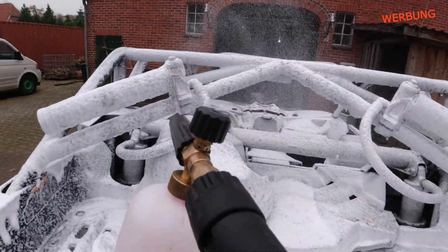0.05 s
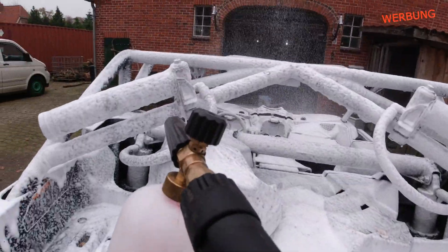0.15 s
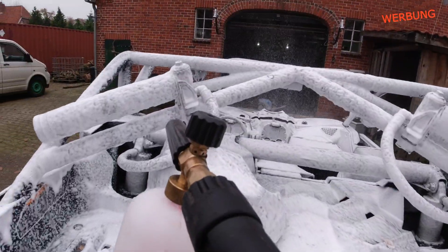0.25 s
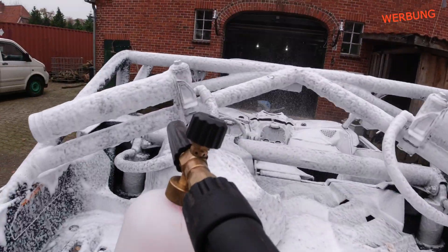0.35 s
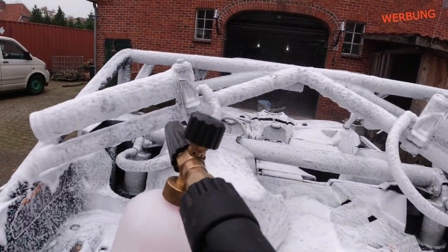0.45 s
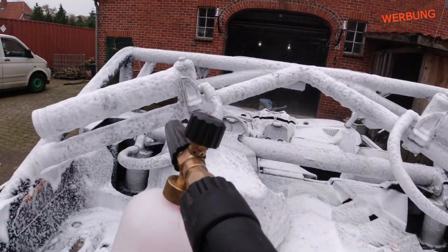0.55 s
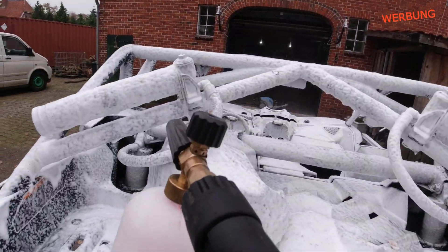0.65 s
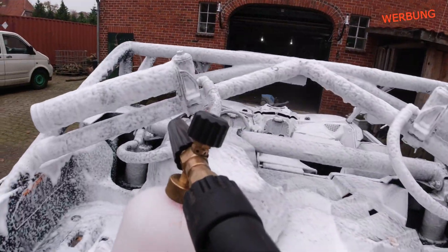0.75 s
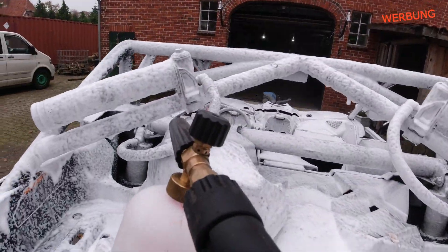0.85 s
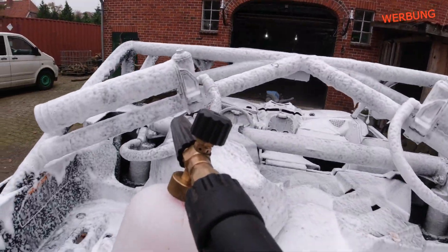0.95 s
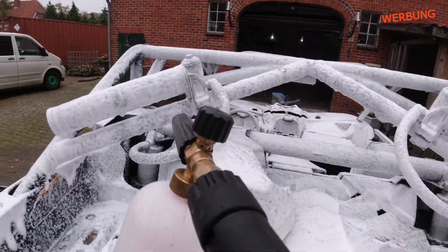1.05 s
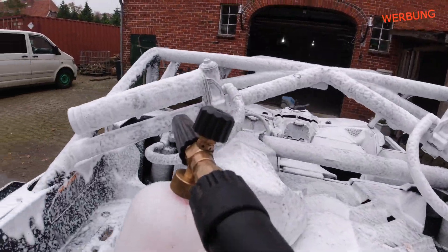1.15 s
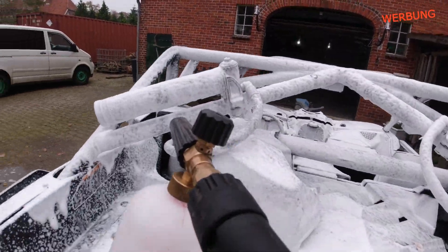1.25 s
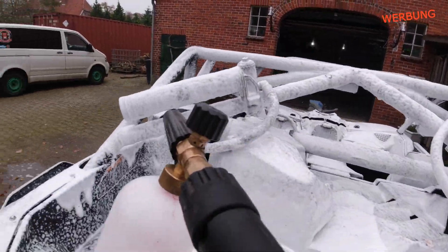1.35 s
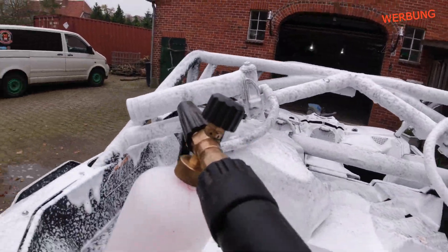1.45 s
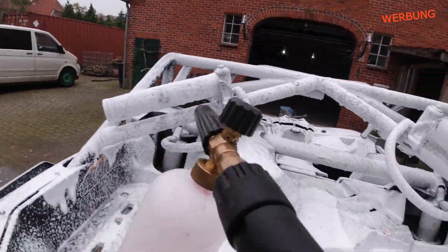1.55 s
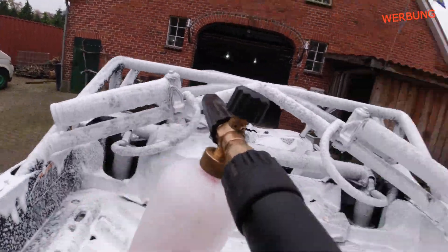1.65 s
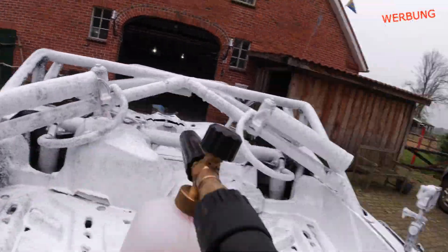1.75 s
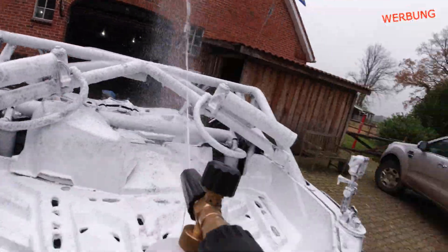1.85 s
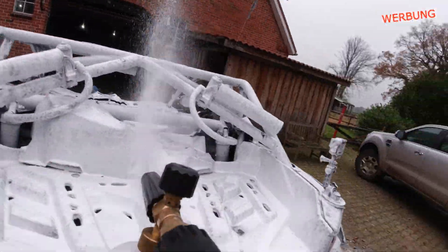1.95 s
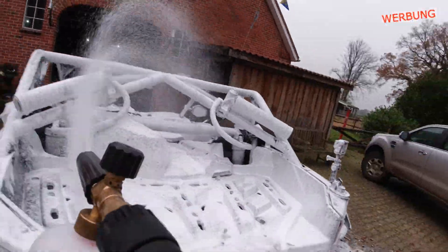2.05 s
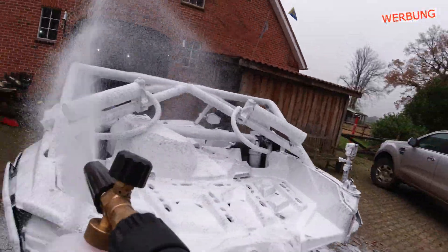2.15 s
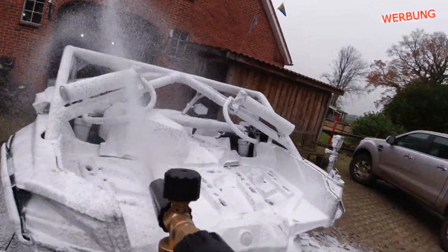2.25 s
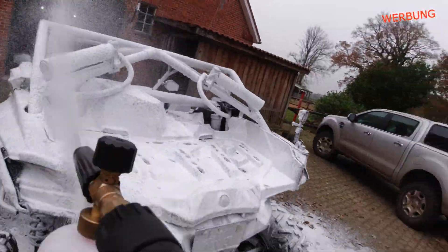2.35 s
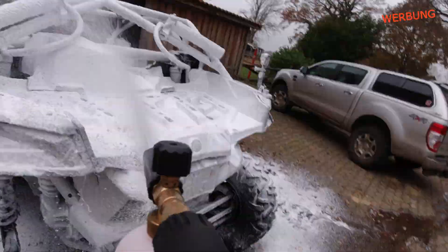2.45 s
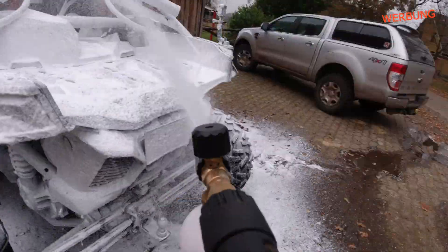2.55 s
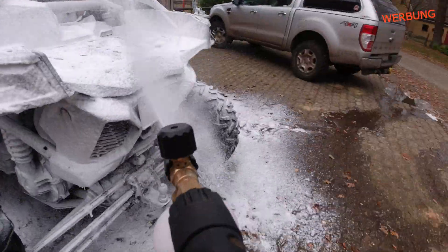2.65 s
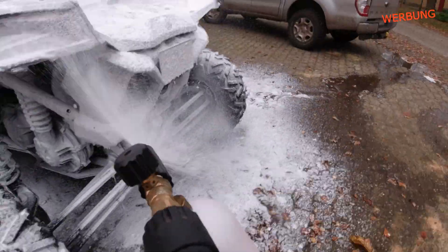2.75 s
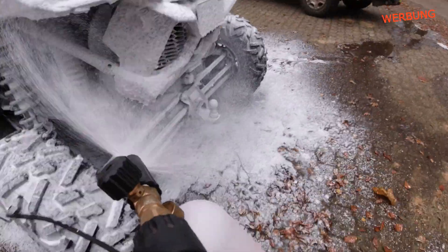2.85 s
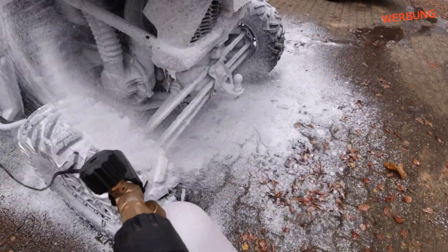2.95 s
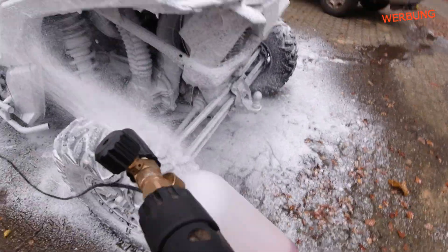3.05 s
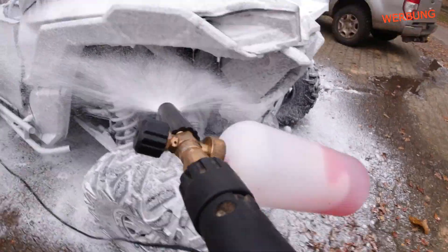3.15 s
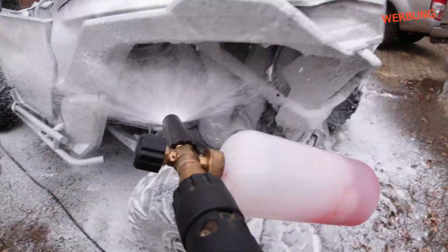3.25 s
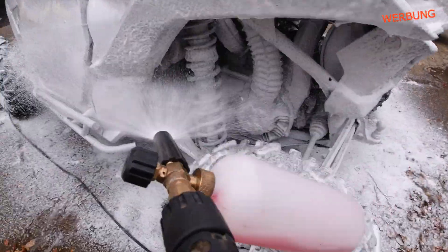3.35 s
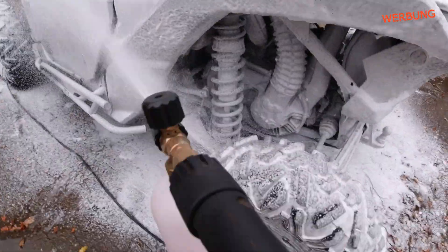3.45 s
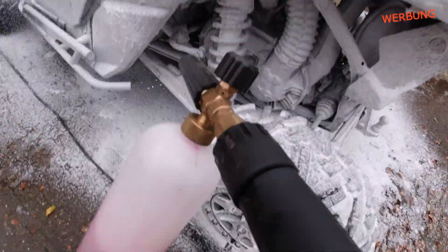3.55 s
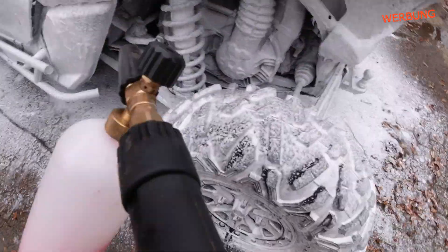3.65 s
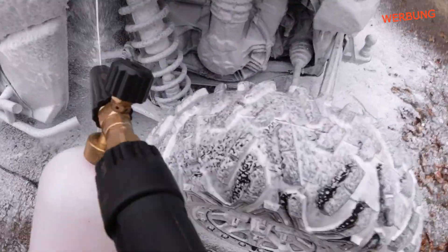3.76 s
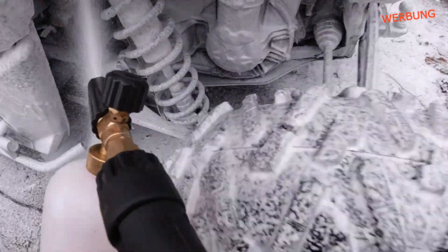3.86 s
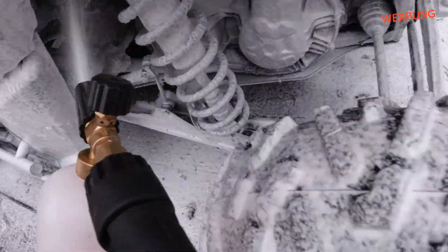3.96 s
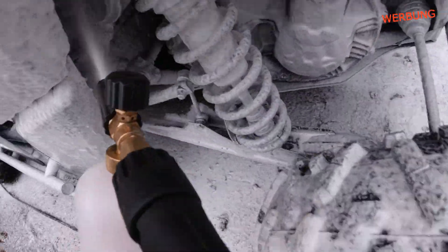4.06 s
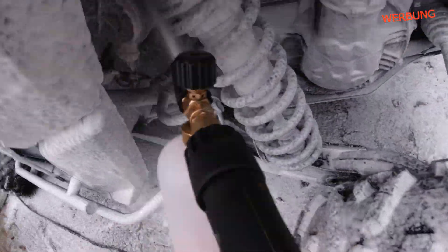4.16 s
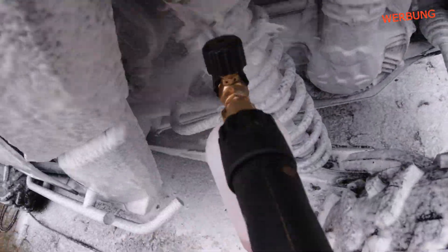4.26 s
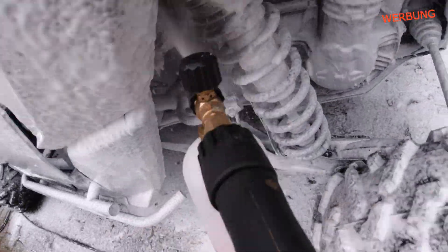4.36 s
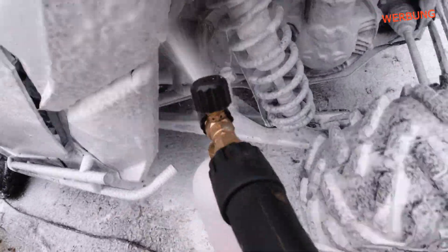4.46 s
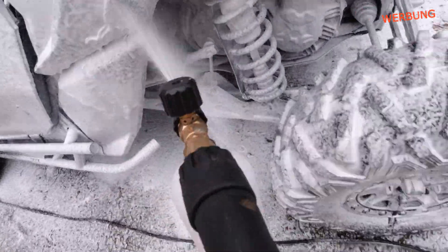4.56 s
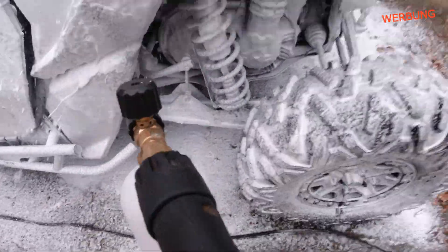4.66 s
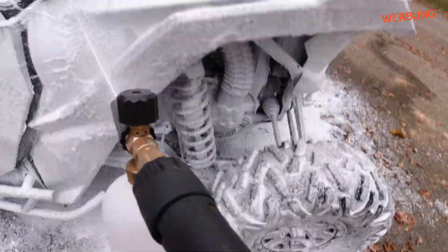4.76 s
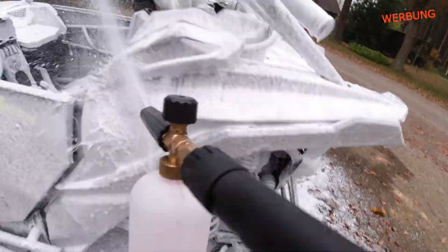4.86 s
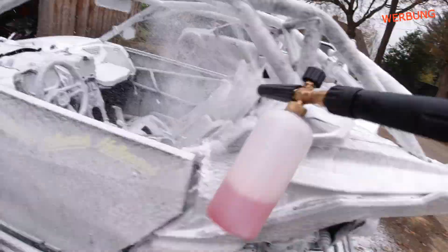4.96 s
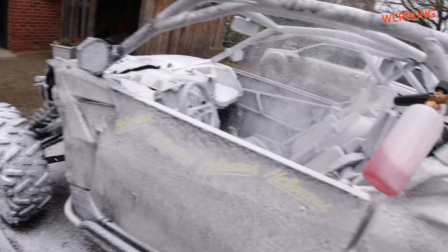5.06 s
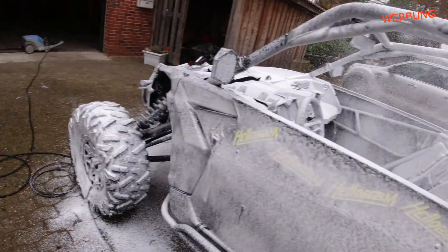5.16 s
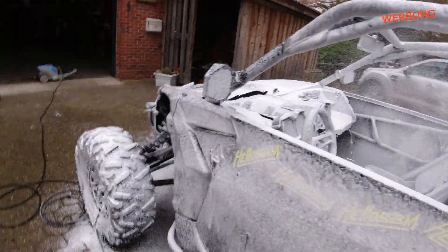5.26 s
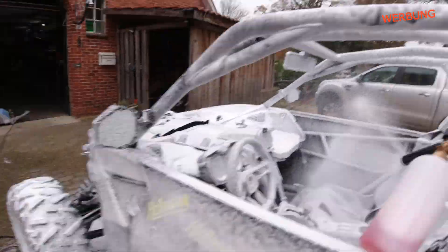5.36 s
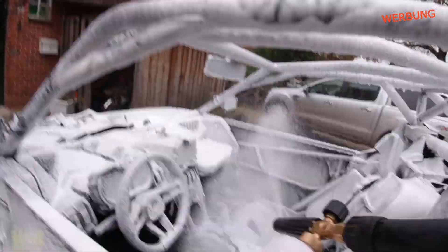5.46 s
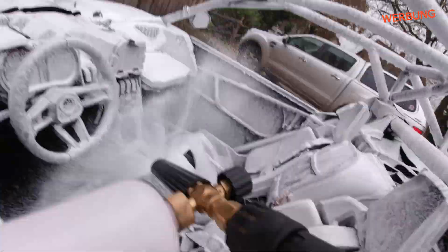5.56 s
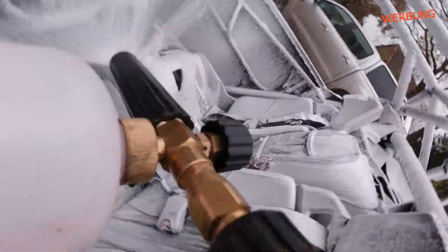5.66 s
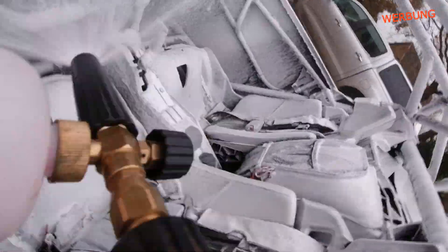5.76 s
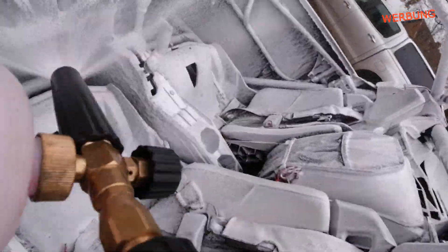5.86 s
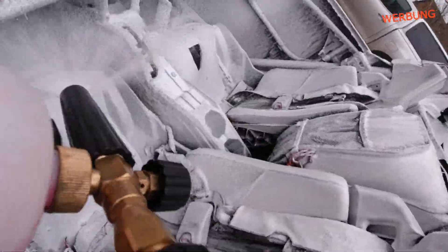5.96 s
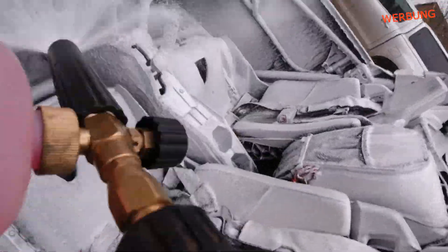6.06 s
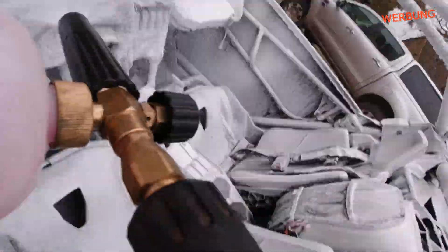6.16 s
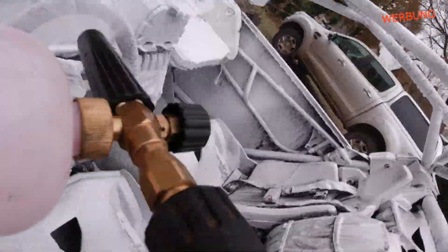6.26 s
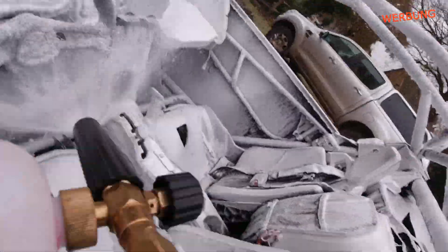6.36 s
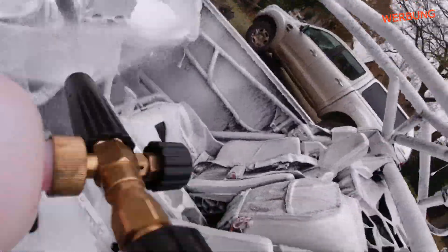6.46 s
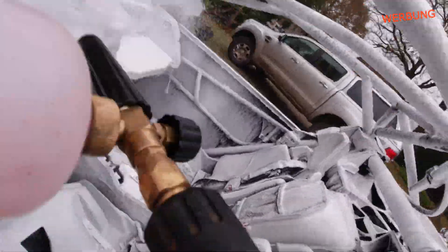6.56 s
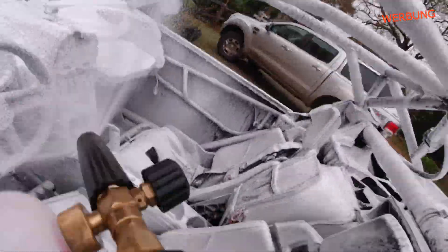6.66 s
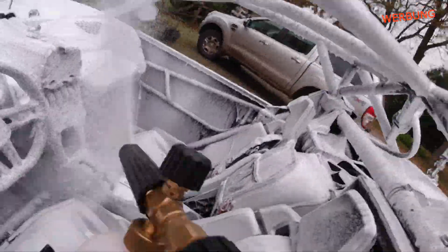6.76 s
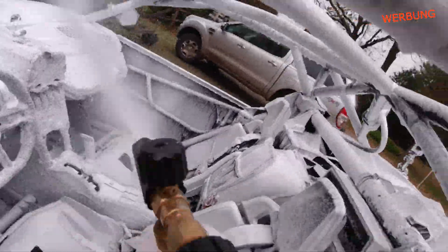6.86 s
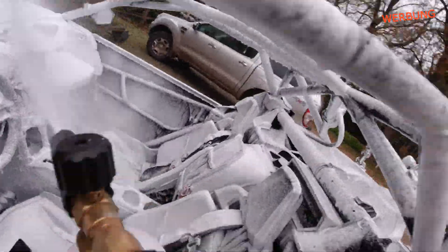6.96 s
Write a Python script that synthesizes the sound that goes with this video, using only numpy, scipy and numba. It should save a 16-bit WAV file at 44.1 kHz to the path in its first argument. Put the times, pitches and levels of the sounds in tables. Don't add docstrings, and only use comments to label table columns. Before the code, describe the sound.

In an open paved yard, a spray tail cuts off at once, leaving faint rumble, rustle and trigger clicks for nearly two seconds. Then a close foam jet spits, stalls for an instant and roars into a steady, whistling hiss. It shuts off twice with clicks and a short gurgle, restarting each time. The last burst wavers as it sweeps across surfaces, with soft knocks on the microphone, which sits very close to the lance in stereo.

```python
import sys
import numpy as np
from scipy import signal
from scipy.fft import rfft, irfft
from scipy.io import wavfile
from scipy.ndimage import uniform_filter1d
from numba import njit

SR = 44100
rng = np.random.default_rng(int(sys.argv[2]) if len(sys.argv) > 2 else 0)


def field_ratio(decibels):
    return 10 ** (np.asarray(decibels, dtype=float) / 20)


def dump(signal):
    limited = np.clip(np.atleast_2d(signal).T, -1, 1)
    pcm = np.round(limited * 32767).astype(np.int16)
    wavfile.write(sys.argv[1], SR, pcm)


N = 308700
TIME = np.arange(N) / SR


def unit(x):
    return x / np.sqrt(np.mean(x ** 2))


def over_hz(points, hz):
    f, v = np.transpose(points)
    return np.interp(np.log(hz + 1), np.log(f), v)


def over_time(table):
    s, *columns = np.transpose(table)
    return [np.interp(TIME, s, c) for c in columns]


def bumps(rows, hold=1.6):
    total_db = 0
    for row in rows:
        total_db = total_db + row[3] * np.minimum(np.interp(TIME, row[:3], [0, hold, 0]), 1)
    return total_db


def within(spans, fade_s=.03):
    gain = np.zeros(N)
    for rows in spans:
        s, db = np.transpose(rows)[:2]
        inside = np.clip(np.minimum(TIME - s[0], s[-1] - TIME) / fade_s + 1, 0, 1)
        gain += field_ratio(np.interp(TIME, s, db)) * inside
    return gain


def swells(rows):
    return within([[(a, db - drop), (b, db), (c, db - drop)] for a, b, c, db, drop in rows])


def walk(count):
    k = SR // count
    steps = np.repeat(rng.standard_normal(N // k + 1), k)[:N]
    return 1.3 * uniform_filter1d(uniform_filter1d(steps, k), k)


def band(x, lo_hz, hi_hz):
    return signal.sosfilt(signal.butter(2, [lo_hz, hi_hz], "band", fs=SR, output="sos"), x)


@njit
def svf(x, hz, width_hz):
    y = np.empty(x.shape)
    for c in range(len(x)):
        b, l = 0., 0.
        for i in range(x.shape[1]):
            g, k = np.tan(np.pi * hz[i] / SR), width_hz / hz[i]
            v = (b + g * (x[c, i] - l)) / (1 + g * (g + k))
            b, l, y[c, i] = 2 * v - b, l + 2 * g * v, k * v
    return y


# [f/Hz, left-right likeness 0-1]
PORT_LIKENESS = [(40, .3), (130, .7), (300, .86), (600, .92), (1400, .93), (2500, .8), (4300, .83),
                 (7000, .7), (15000, .55)]
# [f/Hz, left lead/rad]
PORT_LEAD = [(100, 0), (2500, .3), (4400, 1.05), (7400, 1.2), (10000, .7), (16000, .6)]


def hiss(colour, alike=1.):
    hz = np.arange(N // 2 + 1) * SR / N
    common, own = rfft(rng.standard_normal((2, N)))
    c = np.clip(alike * over_hz(PORT_LIKENESS, hz), 0, 1)
    right = (c * common + np.sqrt(1 - c ** 2) * own) * np.exp(-1j * over_hz(PORT_LEAD, hz))
    return unit(irfft(np.array([common, right]) * field_ratio(over_hz(colour, hz)), N))


def ring(colour, hz, *widths_hz):
    x = hiss(colour)
    for width_hz in widths_hz:
        x = svf(x, hz, width_hz)
    return unit(x)


# [f/Hz, level/dB per Hz]
SPLASH = [(25, -16), (70, -12), (150, -13), (250, -6), (600, -2.5), (1400, -1), (2800, -2), (4300, -3),
          (6000, -5), (9000, -6), (12000, -13), (16000, -18)]
# [t/s, turn to camera/dB, jet in a hollow/dB, fan edge shown/dB]
LANCE = [(0, -9, -1, 0), (2.0, 1, .5, 0), (3.55, 1.2, -.3, 0), (3.9, -3, -1, 2), (4.01, 3, -2, -2),
         (4.13, -2.5, 1, 2), (4.27, 0, 3.5, -1), (4.46, 2.5, 2, -1), (4.62, 0, 0, 1), (5.04, 0, -1, -3),
         (5.28, -20, -1.5, -4), (5.54, -4, 0, -1), (5.79, 3, 1.5, -2), (5.9, -3, 1, -2), (6.09, 2, 0, -4),
         (6.45, -2.5, 2, -1), (6.72, -2.5, 2, -.5), (6.9, 1.5, 0, 0)]
# [t/s, closeness to panels 0-1]
NEAR = [(0, .2), (3.55, .2), (3.9, .7), (4.3, 1.1), (5.0, .8), (5.6, 1.1), (6.2, .8), (7, .9)]
# [start t/s, deepest t/s, end t/s, level/dB]
BREAKS = [(4.04, 4.08, 4.13, -5), (5.69, 5.72, 5.74, -4), (5.84, 5.88, 5.95, -2), (6.11, 6.14, 6.17, -6),
          (6.22, 6.26, 6.285, -6), (6.39, 6.45, 6.5, -3), (6.72, 6.76, 6.81, -6)]
# [start t/s, peak t/s, end t/s, level/dB, f/Hz]
SPLITS = [(3.95, 4.03, 4.12, -36, 4800), (4.17, 4.25, 4.31, -35, 5300), (4.5, 4.6, 4.68, -37, 4900),
          (4.98, 5.07, 5.13, -38, 4900), (5.48, 5.66, 5.72, -34, 4850), (5.7, 5.74, 5.79, -34, 4500),
          (6.4, 6.49, 6.56, -39, 4800), (6.8, 6.91, 7.0, -37, 4800)]
# [start t/s, peak t/s, end t/s, extra level/dB]
SPATTER = [(3.85, 4.05, 4.22, 4), (4.25, 4.335, 4.42, 12), (5.2, 5.45, 5.7, 3), (5.55, 6.15, 6.7, 5),
           (6.7, 6.85, 7.1, 2)]


def lance():
    aim_db, hollow_db, shown_db = over_time(LANCE)
    near, = over_time(NEAR)
    flow_db, settled = flow()
    unsettled = 1 - settled
    white = [(20, 0), (20000, 0)]

    throat_db = -36 + .45 * aim_db + hollow_db + .3 * walk(count=10)
    throat_hz = 1490 + 70 * hollow_db + 40 * walk(count=9)
    throat_ripple_db = -1.5 - 2.5 * unsettled + 1.2 * walk(count=15)
    jet = ring(white, throat_hz, 480., 900.) * field_ratio(throat_ripple_db)

    whistle_db = -28.9 + aim_db + bumps(BREAKS) + .9 * walk(count=40) - throat_db
    whistle_db = whistle_db - 7.5 * unsettled + 1.4 * near * walk(count=14)
    whistle_hz = 4230 - 170 * unsettled + 30 * walk(count=14)
    whistle_hz = whistle_hz * (1 + near * (.012 * walk(count=20) + .006 * walk(count=7)))
    jet += ring(white, whistle_hz, 450., 800.) * field_ratio(whistle_db)

    twin_hz = over_time([row[1::3] for row in SPLITS])[0] * (1 + .02 * walk(count=12))
    twin_gain = swells([(*row[:4], 7) for row in SPLITS]) * field_ratio(1.5 * walk(count=20) - throat_db)
    jet += ring(white, twin_hz, 400., 700.) * twin_gain

    edge_db = -33 + .7 * aim_db + shown_db - throat_db
    edge_hz = 7650 * (1 + .015 * walk(count=6))
    edge_ripple_db = -1.5 - 3 * unsettled + 1.2 * walk(count=20)
    jet += ring(white, edge_hz, 1200., 2200.) * field_ratio(edge_db + edge_ripple_db)

    mist_db = -45.2 + .15 * aim_db + bumps(SPATTER) + 1.2 * walk(count=7) - throat_db
    low_db = -10.5 - .9 * hollow_db + 1.5 * walk(count=6)
    middle_db = 1.1 - .7 * hollow_db - 1.5 * unsettled + .8 * walk(count=12)
    high_db = edge_db - 1.2 - .5 * shown_db + 2.5 * unsettled + .8 * walk(count=12)
    mist_db = mist_db + 1.8 * near + 2.5 * unsettled + .8 * walk(count=20)
    for lo_hz, hi_hz, db in [(90, 750, low_db), (800, 4500, middle_db), (4500, 10000, high_db),
                             (10000, 18000, mist_db)]:
        jet += unit(band(hiss(SPLASH), lo_hz, hi_hz)) * field_ratio(db)

    sputter_db = .55 * walk(count=30) + .8 * walk(count=90)
    return bodywork(jet, near) * field_ratio(throat_db + sputter_db + flow_db - .5)


# [opens t/s, stalls t/s, refills t/s, shuts t/s, stall level/dB]
TRIGGER = [
    (-.5, -.4, -.3, .008, -25),
    (1.878, 1.95, 1.982, 3.563, -25),
    (3.779, 3.838, 3.875, 4.686, -20),
    (4.806, 4.874, 4.897, 7.5, -22.5),
]
# [t/s from it, level/dB]
OPENING = [(-.02, -42), (-.004, -19), (.003, 3), (.02, -1)]
REFILL = [(.003, 0), (.05, 0)]
SHUTTING = [(-.004, 0), (.006, -19), (.035, -34), (.08, -50)]


def flow():
    db, settled = np.full(N, -90.), np.zeros(N)
    for opens, stalls, refills, shuts, stall_db in TRIGGER:
        stall = [(stalls - .008, -4.5), (stalls + .008, stall_db), (refills - .01, stall_db + 3)]
        slam_db = .75 * (-21.5 - stall_db)
        refill = np.add(REFILL, [(refills, slam_db), (refills, 0)])
        opening, shutting = np.add(OPENING, (opens, 0)), np.add(SHUTTING, (shuts, 0))
        times, levels = np.vstack([opening, stall, refill, shutting]).T
        db = np.maximum(db, np.interp(TIME, times, levels, left=-90, right=-90))
        settling_s = [refills - .01, refills + .045, shuts + .2, shuts + .21]
        settled = np.maximum(settled, np.interp(TIME, settling_s, [0, 1, 1, 0]))
    return db, settled


def bodywork(x, near):
    path_s = np.clip(.002 + .0009 * walk(count=3), .0003, .01)
    place = np.arange(N) - SR * path_s
    return x + .35 * near * np.array([np.interp(place, np.arange(N), c) for c in x])


# [loudest t/s, level/dB, f/Hz]
DRAIN = [
    (.045, -57, 1300),
    (3.607, -41, 1345),
    (4.735, -52, 1320),
]


def drain():
    hz = over_time([(s, f) for s, db, f in DRAIN])[0] * (1 + .02 * walk(count=30))
    spans = [[(s - .042, db - 5), (s, db), (s + .07, db - 26)] for s, db, _ in DRAIN]
    return ring(SPLASH, hz, 90., 220.) * within(spans, fade_s=.008) * field_ratio(-.7)


def hits(events, crack, push_s, spread, trim_db):
    length = 8192
    out, t = np.zeros((2, N + length)), np.arange(length) / SR
    for s, db, hz, t60_s in events:
        noise = band(rng.standard_normal((2, length)), hz / spread, hz * spread)
        burst = np.sin(2 * np.pi * hz * t) + crack * unit(noise[0] + .3 * noise)
        i = int(s * SR)
        out[:, i:i + length] += field_ratio(db + trim_db - 60 * t / t60_s) * burst * (1 - np.exp(-t / push_s))
    return out[:, :N]


# [t/s, level/dB, f/Hz, t60/s]
KNOCKS = [(.02, -52, 180, .2), (1.685, -43, 345, .09), (5.374, -32, 320, .1), (5.38, -45, 120, .15),
          (5.389, -31, 213, .11), (5.564, -32, 221, .11), (5.57, -42, 100, .15), (6.417, -29, 554, .07),
          (6.421, -32, 200, .12), (6.425, -39, 110, .15), (6.429, -27, 400, .08), (6.785, -29, 223, .14),
          (6.785, -43, 120, .12)]


def camera_knocks():
    return hits(KNOCKS, crack=.62, push_s=.004, spread=1.9, trim_db=-.7)


# [t/s, level/dB, f/Hz, t60/s]
CLICKS = [(.143, -53, 1400, .015), (.152, -55, 2600, .015), (.192, -61, 2600, .01), (1.682, -50, 2400, .03),
          (1.683, -47, 3600, .012), (1.709, -45, 3400, .014), (1.7244, -54, 2450, .04),
          (1.8223, -55, 3500, .012), (3.5964, -43, 2000, .012), (3.6646, -46, 3200, .014),
          (3.672, -52, 2270, .07), (3.7399, -45, 3530, .012), (3.862, -42, 2250, .09)]


def trigger_clicks():
    return hits(CLICKS, crack=.7, push_s=.0004, spread=1.7, trim_db=1.5)


def tone(hz, spans, wander):
    phase = 2 * np.pi * np.cumsum(hz * (1 + wander * walk(count=30))) / SR
    return np.sqrt(2) * swells(spans) * np.sin(phase)


# [start t/s, peak t/s, end t/s, peak level/dB, ends below peak/dB]
VALVE_SONG = [(3.3, 3.48, 3.56, -48, 3), (5.1, 5.23, 5.45, -39, 8), (5.45, 5.55, 5.62, -50, 5)]
MOTOR = [(2.0, 2.7, 3.4, -55, 1), (3.3, 3.48, 3.6, -47, 12), (4.4, 4.6, 4.7, -55, 5),
         (5.75, 6.0, 6.4, -59, 3)]
FAN = [(-.1, .04, .08, -63, 14), (.3, 1.1, 1.85, -76, 5), (1.95, 2.4, 3.3, -62, 2), (3.3, 3.5, 3.7, -57, 9),
       (3.78, 4.0, 4.7, -59, 5)]
FAR_HUM = [(5.2, 5.3, 5.4, -54, 3)]


def pump():
    fan = (tone(425., FAN, .015) + tone(400., FAR_HUM, .005)) * field_ratio(4 * walk(count=25))
    song = tone(1362., VALVE_SONG, .002) * field_ratio(3.5 + 1.2 * walk(count=25))
    motor = tone(282., MOTOR, .008) * field_ratio(-.7 + 1.8 * walk(count=12))
    return song + motor + fan


def recovered():
    return np.minimum(4.5 * TIME, 8)


# [f/Hz, level/dB per Hz]
YARD = [(20, -12), (60, -5), (210, 0), (330, -6), (430, -5), (600, -15), (1000, -13), (2000, -17),
        (3200, -20), (5000, -30), (8000, -38), (16000, -46)]
# [from t/s, rumble level/dB, middle re rumble/dB, rustle re rumble/dB, spray echo level/dB]
PAUSES = [
    (0, -71, -7, -20, -57),
    (3.56, -59, -7, -19, -57),
    (4.69, -59, -7, -19, -59),
]
# [start t/s, peak t/s, end t/s, extra level/dB]
RUSTLES = [(.38, .46, .56, 8), (1.0, 1.15, 1.3, 3), (1.38, 1.48, 1.6, 7), (1.62, 1.7, 1.8, 6),
           (3.63, 3.68, 3.71, 8)]


def yard():
    pauses = np.transpose(PAUSES)
    now = np.searchsorted(pauses[0], TIME, "right") - 1
    start, rumble_db, middle_db, rustle_db, echo_db = pauses[:, now]
    rise_db = recovered() * (start < 1)
    echo = np.hypot(1, field_ratio(echo_db - rumble_db - 90 * (TIME - start)))
    extra_db = bumps(RUSTLES)
    middle_db = rumble_db + middle_db + 1.4 * rise_db + .25 * extra_db
    rustle_db = rumble_db + rustle_db + 1.4 * rise_db + extra_db
    rumble_db = rumble_db + rise_db
    rumble = unit(band(hiss(YARD, alike=1.05), 20, 500)) * field_ratio(rumble_db - 1.5 + 2.5 * walk(count=8))
    middle = unit(band(hiss(YARD, alike=1.03), 500, 2500)) * field_ratio(middle_db + 1.5 * walk(count=12))
    rustle = unit(band(hiss(YARD), 2500, 17000)) * field_ratio(rustle_db + 5 + 1.5 * walk(count=25))
    return echo ** .8 * rumble + echo ** 1.2 * (middle + rustle)


# [start t/s, peak t/s, end t/s, extra level/dB]
GUSTS = [(.35, .6, .75, 8), (1.9, 2.0, 2.15, 6), (3.45, 3.65, 3.85, 12), (4.25, 4.35, 4.45, 8),
         (4.95, 5.03, 5.1, 6)]


def wind():
    gust_db = -83 + 1.25 * recovered() + 1.1 * TIME + bumps(GUSTS)
    gust_db = gust_db + 5.5 * walk(count=7) + 2.5 * walk(count=16)
    eddies = np.array([field_ratio(gust_db + 2.5 * walk(count=6)) for port in "LR"])
    return unit(band(rng.standard_normal((2, N)), 15, 95)) * eddies


def scene():
    near_sounds = lance() + drain() + camera_knocks() + trigger_clicks()
    return near_sounds + pump() + yard() + wind()


def low_pass(x):
    return signal.sosfilt(signal.butter(12, 16820, fs=SR, output="sos"), x)


def record(dry):
    cut = signal.sosfilt(signal.ellip(10, .2, 80, 15700, fs=SR, output="sos"), dry)
    return low_pass(cut)


dry = scene()
out = record(dry)
dump(out)
```